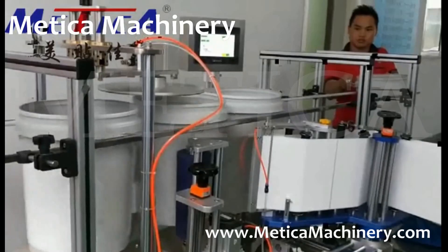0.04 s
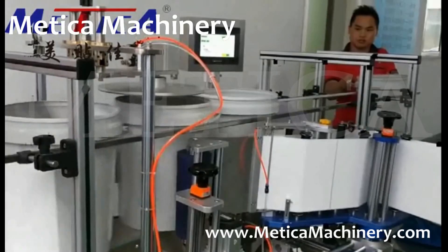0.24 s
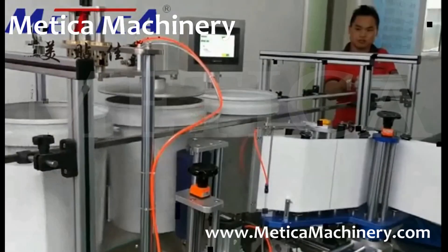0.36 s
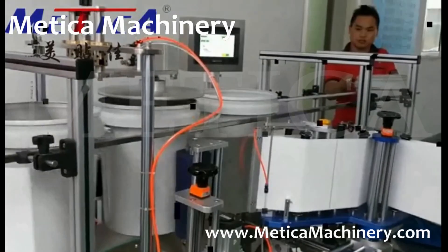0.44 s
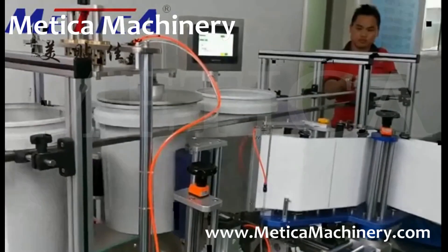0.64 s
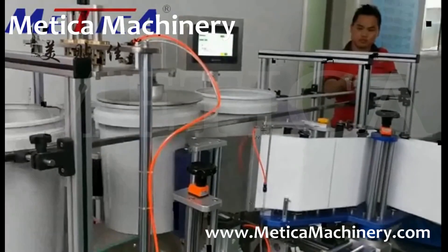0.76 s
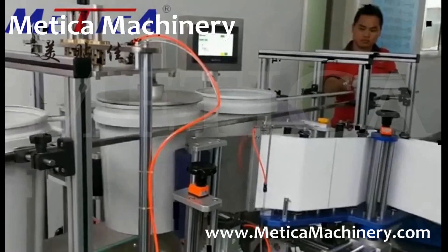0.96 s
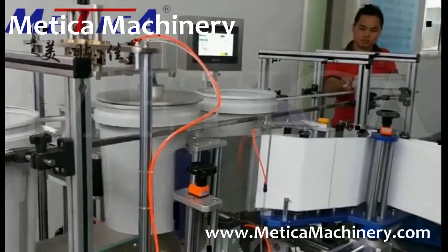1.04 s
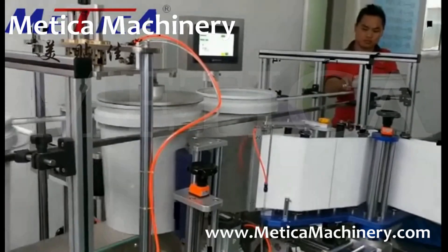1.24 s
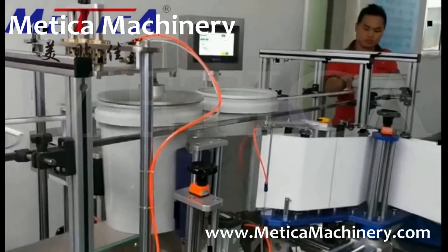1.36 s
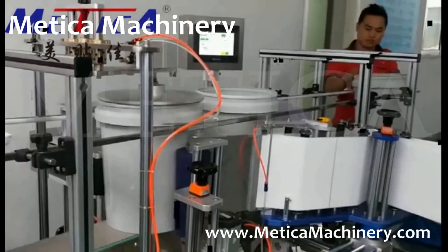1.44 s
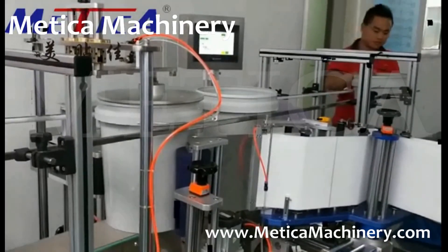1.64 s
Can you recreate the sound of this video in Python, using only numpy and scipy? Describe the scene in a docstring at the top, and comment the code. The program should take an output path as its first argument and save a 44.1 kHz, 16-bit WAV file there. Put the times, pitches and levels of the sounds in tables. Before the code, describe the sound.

A pneumatic press works in a humming, hard-walled factory hall. A short air burst and clack lead into a longer, sinking hiss, low rumble and the hollow thump of a plastic pail, then two soft sliding swishes.

```python
"""Pneumatic lid press in a factory hall

A labeling and lid-pressing machine handles plastic pails in a hard-walled, humming hall. Its frame
rumbles, a valve spits and a stop clacks home. The press cylinder vents with a hiss that sinks with
the pressure; the lid rubs down the rim by stick-slip friction and snaps on, ringing the pail with
a hollow thump. Near the end the sliding mechanism gives two soft rasping swishes."""
import sys
import numpy as np
from scipy import signal
from scipy.fft import rfft, irfft
from scipy.io import wavfile

SR = 44100
rng = np.random.default_rng(int(sys.argv[2]) if len(sys.argv) > 2 else 0)


def store_pcm(level_fs):
    """Save levels as 16-bit WAV."""
    pcm = np.round(np.clip(level_fs, -1, 1) * 32767).astype(np.int16)
    wavfile.write(sys.argv[1], SR, np.atleast_2d(pcm).T)


N = 74970
TIME = np.arange(N) / SR
BIN_HZ = np.arange(N // 2 + 1) * SR / N
CUTOFF_HZ = 7500


def from_db(db):
    """Amplitude ratio of a level in decibels."""
    return 10 ** (np.asarray(db) / 20)


def rms_one(x):
    """Normalisation to unit mean power."""
    return x / np.sqrt(np.mean(x ** 2) + 1e-20)


def envelope(points):
    """Amplitude envelope, linear in level between points (t/s, level/dB)."""
    return from_db(np.interp(TIME, *np.transpose(points)))


def at_hz(points, hz):
    """Interpolation on a logarithmic frequency axis."""
    freqs, values = np.transpose(points)
    return np.interp(np.log(np.maximum(hz, 1)), np.log(freqs), values)


def pan(db):
    """Channel gains for an interaural level difference, left minus right."""
    return from_db(np.array([[db], [-db]]) / 2)


def noise(spectrum=None):
    """Diffuse field of unit power: coherent between the ears in the bass, incoherent in the treble."""
    # f/Hz, interaural coherence
    coherence = [(30, 0), (90, 1), (250, 0.94), (500, 0.94), (950, 0.1), (1800, 0.02), (7000, 0.08)]
    alike = np.clip(at_hz(coherence, BIN_HZ), -1, 1)
    mid, side = rfft(rng.standard_normal((2, N)))
    ears = np.sqrt(1 + alike) * mid + np.sqrt(1 - alike) * side * [[1], [-1]]
    colour = from_db(at_hz(spectrum, BIN_HZ)) if spectrum else 1
    return rms_one(irfft(ears * (BIN_HZ < CUTOFF_HZ) * colour, N))


def swell(peak_s, rise_s, fall_s):
    """Exponential growth to a peak and decay from it, each with its own time constant."""
    return np.exp(-np.maximum((peak_s - TIME) / rise_s, (TIME - peak_s) / fall_s))


def resonate(x, resonances):
    """Forced response of parallel two-pole resonators, each passing the noise power its level gives."""
    response = 0
    for k, (hz, width, db) in enumerate(resonances):
        r = np.exp(-np.pi * width / SR)  # pole radius
        gain = (-1) ** k * from_db(db) * np.sqrt(CUTOFF_HZ / width / np.pi * 2) * (1 - r * r) / 2
        feedback = [1, -2 * r * np.cos(2 * np.pi * hz / SR), r * r]
        response = response + gain * signal.lfilter([1, 0, -1], feedback, x + 1e-18)
    return response


def strike(hits, modes):
    """Impact excitation of damped modes: the longer the contact, the weaker the high modes."""
    force = 0
    for s, db, contact in hits:
        pulse = np.exp(-(2 * (TIME - s) / contact) ** 2)
        force = force + from_db(db) * pulse / pulse.sum()
    ring = sum(from_db(db) * np.exp(-np.log(1000) * TIME / t60) * np.cos(2 * np.pi * hz * TIME)
               for hz, db, t60 in modes)
    return signal.fftconvolve(force, ring)[:N]


def gliding_band(hz, width_hz):
    """Narrow-band stereo noise by quadrature modulation; centre and bandwidth may move."""
    hz, width_hz = hz * np.ones(N), width_hz * np.ones(N)
    lowpass = signal.butter(2, width_hz.max() / 2, fs=SR, output="sos")
    slow = signal.sosfilt(lowpass, rng.standard_normal((4, 2 * N)))
    position = N + np.cumsum(width_hz / width_hz.max())  # slower modulation narrows the band
    a, b = np.reshape([np.interp(position, np.arange(2 * N), row) for row in slow], (2, 2, N))
    phase = 2 * np.pi * np.cumsum(hz) / SR
    return rms_one(a * np.cos(phase) + b * np.sin(phase))


def slips(shape, per_s):
    """Stick-slip friction as a Poisson train of impulses of random strength."""
    return rms_one((rng.random(shape) < per_s / SR) * rng.standard_normal(shape))


def background(waver_hz=13):
    """Broadband ventilation noise lies under the wavering narrow-band hum of motors."""
    # ventilation spectrum: f/Hz, level/dB
    ventilation = [(18, -25), (30, -7.5), (123, -17.5), (220, -9.5), (284, -13.5), (349, -10), (411, -14.5),
                   (542, -16), (823, -15), (1140, -17), (1650, -17), (5760, -26.5), (7600, -45),
                   (9880, -73), (16700, -120)]
    # tones of motors and panels: f/Hz, level/dB
    tones = [(97, -48), (208, -52.5), (226, -46.5), (436, -61), (775, -55), (925, -55.5)]
    hum = sum(from_db(db) * rms_one(gliding_band(hz, waver_hz)[0]) for hz, db in tones)
    return from_db(-36.5) * noise(ventilation) * pan(2) + hum


def frame():
    """Structure-borne sound: each stroke jolts the low modes of the rumbling frame."""
    # strokes: t/s, level/dB, contact/s
    jolts = [(.142, -15.5, 0.0049), (.228, -32, 0.0018), (.264, -26, 0.0015), (.378, -15, 0.0034),
             (.660, -20, 0.0015), (.752, -20.5, 0.0042), (.963, -23, .005)]
    # frame modes: f/Hz, level/dB, T60/s
    modes = [(98.2, 0, .2), (134.7, -1.5, 0.15), (212, -3.5, 0.28)]
    # rumble envelope: t/s, level/dB
    rumble = [(.1, -43), (.24, -31), (.42, -28.5), (.54, -40), (.66, -23), (.85, -25), (.96, -35),
              (1.02, -39), (1.42, -54.5), (1.53, -39.5), (1.7, -56)]
    # rumble spectrum: f/Hz, level/dB
    spectrum = [(35, -41.5), (65, -25), (94, -5.5), (135, -13), (215, -9), (290, -17), (450, -17.5),
                (700, -45)]
    return strike(jolts, modes) + envelope(rumble) * noise(spectrum)


def valve():
    """A brief turbulent jet spits from the valve."""
    # jet spectrum: f/Hz, level/dB
    spectrum = [(300, -25.5), (1200, -5), (2800, -9), (3700, -4.5), (4600, -1.5), (5250, 1), (5700, -10),
                (6400, -15), (7500, -24.5)]
    return from_db(-17) * swell(peak_s=0.1482, rise_s=0.012, fall_s=0.043) * noise(spectrum)


def stop(attack_s=0.00039, crack_db=-17.5):
    """Impact and rebound: bursts of metal chatter radiate directly and drive the stop's resonances."""
    # blows: t/s, level/dB, decay time/s
    clacks = [(.158, -18.5, 0.0059), (0.167, -20, 0.023), (0.197, -27.5, 0.028), (0.258, -30, 0.0068)]
    # resonances of the stop: f/Hz, bandwidth/Hz, level/dB
    resonances = [(435, 20, -3), (803, 57, 1.5), (917, 200, -1), (1102, 40, -4.5), (1236, 74, -4.5),
                  (1666, 130, -3.5), (2048, 56, -6.5), (2398, 41, -6.5), (3000, 280, -6), (3585, 36, -12),
                  (3880, 150, -12), (5000, 69, -10), (6570, 140, -19)]
    chatter = noise() * sum(from_db(db) * swell(s, attack_s, decay) for s, db, decay in clacks)
    return resonate(chatter, resonances) + from_db(crack_db) * chatter


def bracket():
    """Free vibration of the bracket after the stop's first blow gives a hollow knock."""
    # blow: t/s, level/dB, contact/s
    knocks = [(.1625, -10, 0.0011)]
    # bracket modes: f/Hz, level/dB, T60/s
    modes = [(262, -11, .2), (395, -8, .07), (438, 0, .125), (505, -24, .5), (836, -20, 1.0)]
    return strike(knocks, modes)


def exhaust(vent_s=0.38, pressure_fall_s=0.074, start_hz=5650, end_hz=2560, fade_db_per_s=7):
    """Jet noise of the venting cylinder: its whistle sinks and narrows as the pressure decays."""
    # outflow envelope: t/s, level/dB
    outflow = [(.31, -83.5), (.368, -29.5), (.383, -21.5), (.41, -22), (.45, -26), (.50, -27), (.60, -28.5),
               (.70, -32), (.75, -37.5), (.85, -36.5), (1.1, -80)]
    # jet spectrum: f/Hz, level/dB
    jet = [(300, -3), (900, -12), (1800, -9.5), (3000, -3), (4300, -1), (5500, -1.5), (6400, -6),
           (6900, -25), (7500, -23.5)]
    # spectrum of the first rush: f/Hz, level/dB
    onset = [(2500, -25), (3700, -15), (4400, -0.5), (5500, -2), (6400, 0.5), (6900, -8.5), (7500, -21)]
    # outlet resonances, excited as the whistle sweeps past: f/Hz, bandwidth/Hz, level/dB
    outlet = [(2747, 11, -20), (2976, 6.7, -16.5), (4120, 16, -15), (4394, 55, -8.5), (4470, 53, -7.5),
              (4970, 30, -18.5), (5050, 22, -13.5), (5280, 7.5, -12), (5460, 56, -13)]
    flow = envelope(outflow)
    age = np.maximum(TIME - vent_s, 0)
    pressure = np.exp(-age / pressure_fall_s)
    hz = end_hz + (start_hz - end_hz) * pressure
    band = gliding_band(hz, width_hz=340 + 1500 * pressure ** 2)
    whistle = flow * from_db(-0.5 - fade_db_per_s * age) * band
    upper_hz = 1.3 * hz
    upper_band = from_db(-3 + at_hz(jet, upper_hz)) * gliding_band(upper_hz, width_hz=1500)
    hiss = flow * (upper_band + from_db(0.5) * noise(jet))
    rush = from_db(-19.5) * swell(peak_s=0.398, rise_s=0.01, fall_s=0.03) * noise(onset)
    return rush + hiss + whistle + from_db(-1.5) * resonate(whistle, outlet)


def lid():
    """Stick-slip friction as the lid rubs down the rim; its snap then excites the pail's modes."""
    # friction envelope: t/s, level/dB
    rub = [(.53, -78), (.585, -28.5), (.63, -24), (.67, -30), (.715, -25.5), (.77, -83)]
    # resonances of the rubbed lid and rim: f/Hz, bandwidth/Hz, level/dB
    resonances = [(115, 99, -9), (194.7, 65, 4), (315, 310, 1.5), (414, 210, -3.5), (818, 120, -5.5),
                  (1120, 160, -5), (1900, 520, -8)]
    # the lid snaps on and settles: t/s, level/dB, contact/s
    snaps = [(.7308, -5, 0.001), (.822, -31, 0.0019), (.850, -20, 0.00097), (.924, -22, 0.0014),
             (.962, -33, 0.0025)]
    # pail modes: f/Hz, level/dB, T60/s
    modes = [(190, -15.5, .3), (211.6, -15, 1.14), (224.6, -4, .22), (304, -0.5, 0.038),
             (401, -12.5, 0.079), (766, -7.5, 0.21), (878, 2.5, 0.033), (946, -0.5, 0.2),
             (1290, -16.5, 0.031), (1900, -32, 0.067)]
    rubbing = rms_one(resonate(slips(N, per_s=800), resonances))
    return envelope(rub) * rubbing + strike(snaps, modes)


def swishes(hiss_db=-2.5, rasp_db=-3.5):
    """Sliding friction hisses, while tiny catches excite the resonances of the moving parts."""
    # overlapping swells: peak t/s, level/dB, rise/s, fall/s
    swells = [(1.408, -36, 0.036, 0.044), (1.484, -31.5, 0.0091, 0.025), (1.515, -31, 0.018, 0.03),
              (1.583, -31, 0.025, 0.059), (1.695, -35.5, 0.009, .03)]
    # friction spectrum: f/Hz, level/dB
    spectrum = [(200, -20), (450, 7), (650, -32), (1400, -0.5), (1900, -9.5), (2900, 1), (3800, -5.5),
                (5300, -5), (6300, -19.5), (7500, -17)]
    # resonances of the sliding parts: f/Hz, bandwidth/Hz, level/dB
    resonances = [(776, 55, -1.5), (1010, 39, -7), (1264, 50, -2.5), (1484, 45, -6), (1865, 75, -6),
                  (2165, 31, -6.5), (3020, 120, -14), (3250, 60, -20), (4200, 45, -12), (6700, 35, -23)]
    rasp = from_db(rasp_db) * rms_one(resonate(slips((2, N), per_s=1500), resonances))
    hiss = from_db(hiss_db) * noise(spectrum)
    return (hiss + rasp) * sum(from_db(db) * swell(s, rise, fall) for s, db, rise, fall in swells)


def reverberate(x, build_s=0.004):
    """Diffuse reverberation builds up quickly and decays exponentially, slowest in the midrange."""
    # reverberation time of the hall: f/Hz, T60/s
    t60 = [(100, 0.55), (250, 1), (1000, 1.92), (3000, 1.33), (7000, 1.1)]
    white = rfft(noise())
    edges_hz = np.geomspace(40, 8000, 10)
    tail = 0
    for lo, hi in zip(edges_hz, edges_hz[1:]):
        band = irfft(white * ((BIN_HZ >= lo) & (BIN_HZ < hi)), N)
        tail = tail + band * np.exp(-np.log(1000) * TIME / at_hz(t60, np.sqrt(lo * hi)))
    tail = rms_one(tail * (1 - np.exp(-TIME / build_s)))
    return signal.fftconvolve(x, tail * np.sqrt(2 * CUTOFF_HZ / SR / N), axes=1)[:, :N]


def scene():
    """Superposition of the machine's direct sound, its reverberant field and the hall's background."""
    # direct sound, level/dB fed to the reverberation
    parts = [((valve() + exhaust()) * pan(-1), -6),
             (stop() * pan(-2), -5),
             (bracket() * pan(0), -19.5),
             (lid() + frame(), -8),
             (swishes(), -6.5)]
    direct = sum(x for x, _ in parts)
    reverberant = reverberate(sum(from_db(db) * x for x, db in parts))
    return direct + reverberant + background()


def record(dry, low_cut_hz=21.4):
    """Band limiting: a gentle high-pass thins the deep bass and a steep low-pass cuts the top."""
    highpass = signal.butter(1, low_cut_hz, "high", fs=SR, output="sos")
    lowpass = signal.ellip(12, .2, 90, CUTOFF_HZ, fs=SR, output="sos")
    return signal.sosfilt(lowpass, signal.sosfilt(highpass, dry))


dry = scene()
out = record(dry)
store_pcm(out)
```